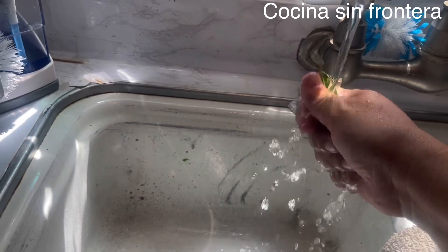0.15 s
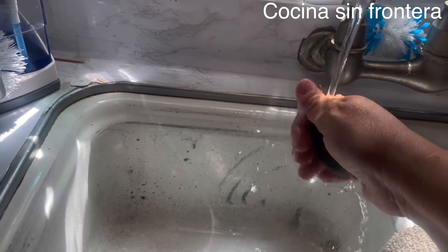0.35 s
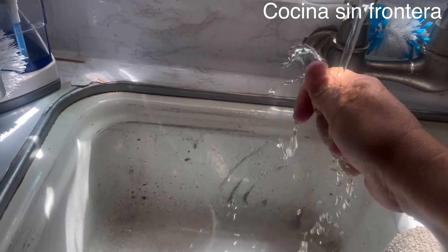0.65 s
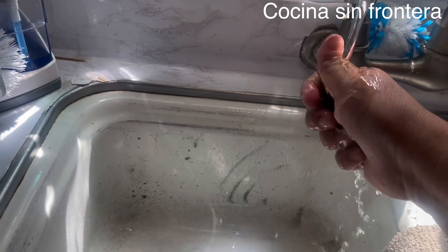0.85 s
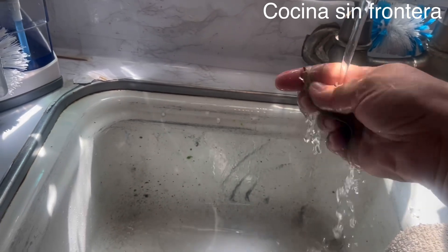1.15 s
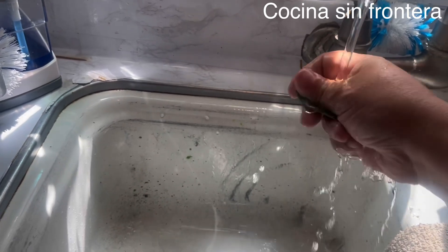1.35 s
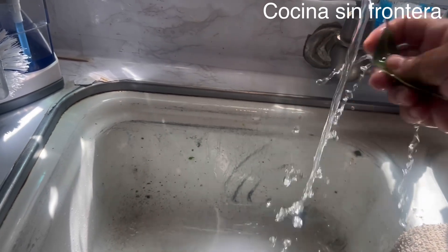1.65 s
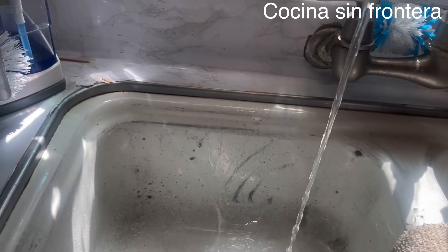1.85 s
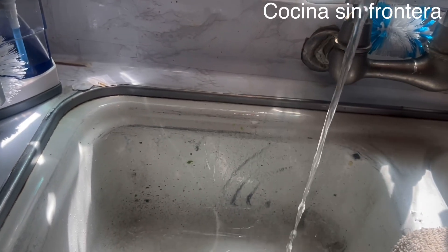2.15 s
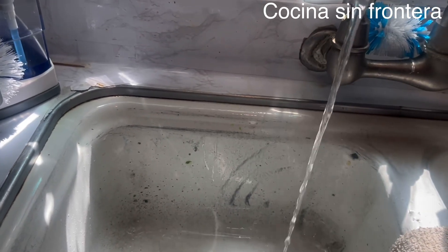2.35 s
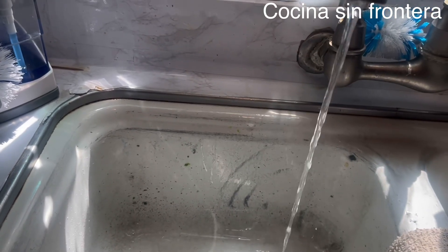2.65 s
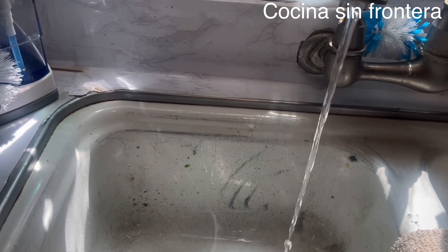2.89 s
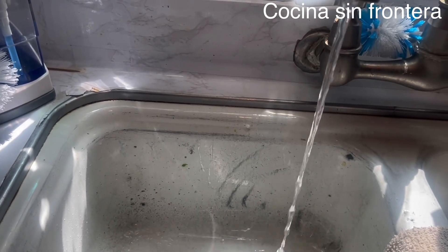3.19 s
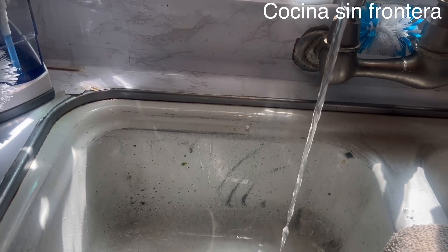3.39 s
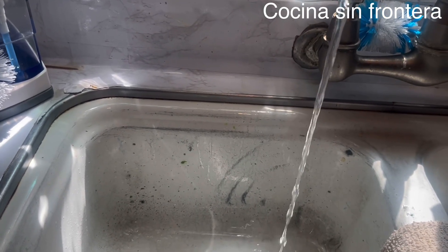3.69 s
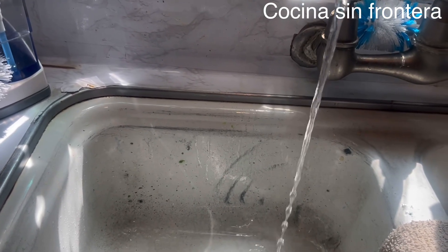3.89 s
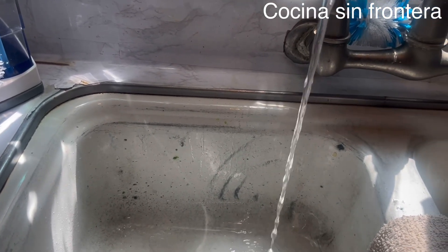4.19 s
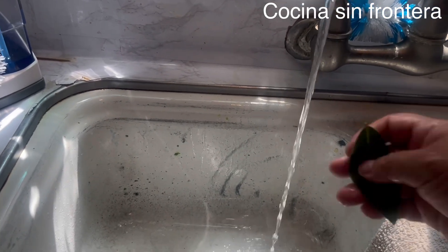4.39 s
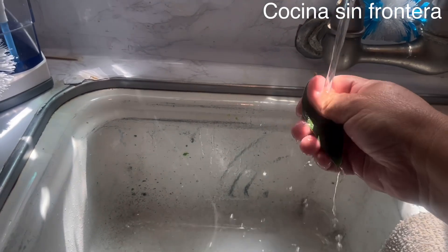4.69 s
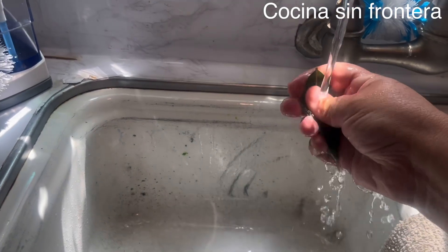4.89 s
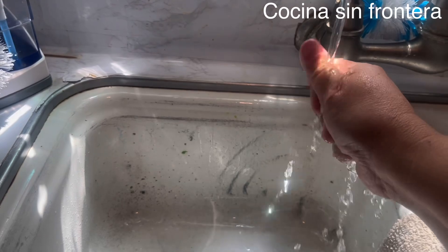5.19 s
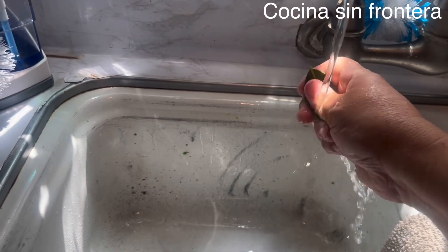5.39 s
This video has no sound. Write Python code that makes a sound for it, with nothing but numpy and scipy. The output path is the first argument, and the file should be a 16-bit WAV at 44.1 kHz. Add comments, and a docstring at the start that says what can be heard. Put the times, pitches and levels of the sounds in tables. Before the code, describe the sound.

Thin tap water splashes unevenly off a moving hand into a metal sink, then falls freely with hollow patter before being broken up again.

```python
"""A thin tap stream falls into a steel kitchen sink; a hand rinsing leaves breaks it up, leaves it and returns.
Drops burst in the shallow water: each is a crack of noise, gliding bubble tones, a low plop and splatter.
From about 1.8 to 4.6 s the stream falls freely and its patter and lumps ring the modes of the basin.
Fine spray hisses as flickering filtered noise; low rumble and an appliance's wavering hum lie behind.
Two microphone ports a few centimetres apart hear it from the side."""
import sys
import numpy as np
from scipy import signal
from scipy.fft import rfft, irfft
from scipy.io import wavfile

SR = 44100
rng = np.random.default_rng(int(sys.argv[2]) if len(sys.argv) > 2 else 0)


def store_wav(level_fs):
    """Save 16-bit WAV to argv[1]."""
    pcm = np.round(np.clip(np.atleast_2d(level_fs), -1, 1) * 32767)
    wavfile.write(sys.argv[1], SR, pcm.T.astype(np.int16))


N = 244314
HZ = np.arange(N // 2 + 1) * SR / N   # frequencies of the spectrum bins

# the hand leaves the stream and comes back; each change takes CHANGE_S and is complete at these times
STREAM_LANDS_S, STREAM_BROKEN_S, CHANGE_S = 1.82, 4.65, 0.072
SPRAY_DB, SPRAY_FADE_DB_PER_S = -44.5, 0.36   # rms at the start without gushes, then a slow fade
GUSH_RISE_S, GUSH_FALL_S = 0.043, 0.057
RUMBLE_DB = -43   # rms
MOTOR_HZ, MOTOR_DB = 57.7, -42.5   # mean pitch, rms

DRUM_BROKEN_DB, DRUM_FREE_DB = -60.5, -51   # middle level of the patter that drives the basin modes
RANDOM_LUMPS_PER_S, RANDOM_LUMP_DB, LUMP_SPREAD_DB = 90, -35, 2.5   # free stream only
LUMP_KNOCK, LUMP_WASH = 1.9, 0.36   # gains of the sharp first contact and of the wash that follows

FAINT_PLINKS_PER_S, FAINT_PLINK_DB, FAINT_PLINK_CYCLES = 35, -54, 90   # lowest level; cycles in one t60
SWEEP_ROUGH_DB = 4   # spread of the level flutter
TICKS_PER_S, FREE_TICKS_PER_S = 70, 12   # faint drops; those added under the free stream
FREE_CRACK_DB = 10.5   # the free stream brightens the faint drops
TICK_MS = 0.26   # swell time of a lone tick
BUBBLE_RISE = .03   # relative pitch rise in one swell time
PLOP_HZ, PLOP_SPREAD_HZ = 2607, 180   # lowest plop pitch and random range, at the top of the plop's own swell
FREE_PLOP_RISE, FREE_PLOP_LONGER = 0.13, 0.657   # plops glide less and are shorter under the free stream
TWIN_DB, CRACK_OWN = -7.5, 0.13   # a second, smaller bubble; independent crack noise at each port
SPLATTER_PER_S, SPLATTER_DB, SPLATTER_T60_S = 2500, -24.5, 0.026   # level relative to bubble plus plop
SPLATTER_OWN = 1   # independent part at each port

SINK_T60_S, SINK_DB = 0.11, -9.5   # dense tail: decay of its noise, energy at the left port
ECHO_S, ECHO_DB, ECHO_CUT_HZ = .0035, -12.5, 42000
RING_DB = -43   # offset of all ringing high modes
RIPPLE_PER_S = 1100   # the moving water film keeps changing the tail
CUTOFF_HZ = 16500


def from_db(db):
    """The logarithmic level law: a level in dB becomes an amplitude gain."""
    return 10 ** (np.asarray(db) / 20)


def rms_one(x):
    """Normalisation by mean power: x scaled to rms 1."""
    return x / np.sqrt(np.mean(x ** 2) + 1e-20)


def at_hz(points, hz):
    """Logarithmic pitch scale: a table is interpolated evenly over log frequency."""
    table = np.array(points)
    return np.interp(np.log(hz + 1), np.log(table[:, 0]), table[:, 1])


def coloured(x, spectrum):
    """Linear filtering: each frequency of x is weighted by a gain in dB."""
    return irfft(rfft(x) * from_db(at_hz(spectrum, HZ)), N)


def drift(rate):
    """Low-pass random process: white noise through two equal poles at rate Hz wanders with spread 1."""
    r = np.exp(-2 * np.pi * rate / SR)
    wander = signal.lfilter([1], [1, -2 * r, r * r], rng.standard_normal(N + SR))
    return rms_one(wander[SR:])   # the first second settles the filter


def resonance(x, hz, width):
    """Damped oscillator: a two-pole band-pass with gain near 1 on top, whose width sets its decay."""
    r = np.exp(-np.pi * width / SR)
    poles = [1, -2 * r * np.cos(2 * np.pi * hz / SR), r * r]
    return signal.lfilter([(1 - r * r) / 2, 0, (r * r - 1) / 2], poles, x)


def partly_alike(mid, side):
    """Partial coherence: mid and side noise are weighted so that the ports correlate band by band."""
    # Correlation of steady noise at the two ports: frequency_hz, correlation
    likeness = [(60, 0.94), (300, 0.87), (600, 0.88), (900, 0.25), (2000, 0.53), (5000, 0.37), (7500, 1),
                (16000, 1)]
    alike = np.clip(at_hz(likeness, HZ), 0, 1)
    common = np.sqrt(1 + alike) * rfft(mid)
    opposed = np.sqrt(1 - alike) * rfft(side) * [[1], [-1]]
    return irfft(common + opposed, N) / np.sqrt(2)


def two_draws(make):
    """Independent sources add in power: two runs of a noise maker give stereo noise of rms 1."""
    return rms_one(partly_alike(make(), make()))


def ports(x):
    """Diffraction and path difference: the housing and the gap shift level and phase between the ports."""
    # Left level above right: frequency_hz, level_db
    left_louder = [(60, 1.5), (300, 3), (1500, 0.8), (3000, 4.5), (4000, 4.5), (4900, 8), (6200, 3),
                   (8000, -0.5), (16000, 0.3)]
    # Left phase ahead of right: frequency_hz, phase_rad
    left_leads = [(60, 0), (300, .1), (780, .9), (1500, -1.5), (1900, .4), (3000, .9), (4600, .4),
                  (5500, -1.3), (6600, -1.5), (8200, -3.1), (10000, -4.8), (12000, -6.3), (15500, -9.4)]
    half = from_db(at_hz(left_louder, HZ) / 2) * np.exp(.5j * at_hz(left_leads, HZ))
    return irfft(rfft(x) * [half, 1 / half], N)


def sink(x):
    """Reflection and reverberation: a near-wall echo, ringing high modes, and a dense tail torn by ripples."""
    # Colour of the tail: frequency_hz, gain_db
    tail_colour = [(1200, 5.5), (2000, 12.5), (3500, 11), (5000, 13), (8000, 4.5), (16000, 3.5)]
    # High modes of the basin: pitch_hz, level_db (before RING_DB), t60_s
    high_modes = [(3030, -27, 0.14), (3150, -2, 0.091)]
    t = np.arange(N) / SR
    shared, own = rng.standard_normal(N), rng.standard_normal((2, N))
    decay = from_db(-60 * t / SINK_T60_S) * (1 - np.exp(-t / 0.00029))
    tail = coloured((shared + 0.75 * own) * decay, tail_colour)
    tail = from_db(SINK_DB) * tail / np.sqrt(np.sum(tail[0] ** 2))
    ring = sum(from_db(RING_DB + db - 60 * t / t60) * np.sin(2 * np.pi * hz * t)
               for hz, db, t60 in high_modes)
    delay = np.exp(-2j * np.pi * HZ * ECHO_S)
    echo = from_db(ECHO_DB) * delay / (1 + 1j * HZ / ECHO_CUT_HZ) ** 2
    ripples = np.cos(1.3 * drift(RIPPLE_PER_S)) + np.sin(1.3 * drift(RIPPLE_PER_S))
    return irfft(rfft(x * ripples) * rfft(tail) + rfft(x) * (rfft(ring) + echo), N)


def hum():
    """Narrow-band noise: a motor tone of unsteady speed, and noise twice through resonances that wavers."""
    # Wavering tones: pitch_hz, width_hz (of each of two passes), level_db (rms)
    hum_tones = [(37, 10, -57), (86.14, 3.5, -50), (122.6, 24, -48), (223.6, 25, -57.5), (342.8, 28, -60.5),
                 (474, 7.4, -78)]
    white = rng.standard_normal(N + SR)
    turns = np.cumsum(MOTOR_HZ + 0.58 * drift(3.3)) / SR
    motor = from_db(MOTOR_DB + 0.38 * drift(22)) * np.sqrt(2) * np.sin(2 * np.pi * turns)
    tones = sum(from_db(db) * rms_one(resonance(resonance(white, hz, width), hz, width)[SR:])
                for hz, width, db in hum_tones)
    return motor + tones


def rumble():
    """Spectral shaping: steady noise is weighted towards the bass."""
    # Shape of the rumble before scaling to rms 1: frequency_hz, density_db
    rumble_colour = [(15, -62), (25, -29), (41, -18.5), (64, 1), (87, -8.5), (124, -5.5), (244, -18.5),
                     (458, -11), (541, -22.5), (900, -64), (1170, -77), (1980, -120)]
    return from_db(RUMBLE_DB) * two_draws(lambda: coloured(rng.standard_normal(N), rumble_colour))


def free_stream():
    """Crossfade between flow states: 0 while the hand breaks the stream up, 1 while it falls freely."""
    t = np.arange(N) / SR
    landing = (t - STREAM_LANDS_S) / CHANGE_S + 1
    breaking = (STREAM_BROKEN_S - t) / CHANGE_S
    return np.clip(np.minimum(landing, breaking), 0, 1)


def spray_level():
    """Level envelope in dB: a slow linear fade, with a quick rise and fall at each gush."""
    # Gushes off the hand that raise the spray: peak_s, rise_db (above the steady spray)
    gush_peaks = [(0, 10.5), (1.79, 3)]
    t = np.arange(N) / SR
    gush = sum(db * np.clip(np.minimum(1 + (t - s) / GUSH_RISE_S, 1 - (t - s) / GUSH_FALL_S), 0, 1)
               for s, db in gush_peaks)
    return SPRAY_DB - SPRAY_FADE_DB_PER_S * t + gush


def spray(grain_db, gust_db):
    """Modulated noise: many fine droplets make a hiss that flickers fast and swells in short gusts."""
    # Colour of the hiss as the microphone hears it, before scaling to rms 1: frequency_hz, density_db
    hiss_colour = [(400, 1.5), (800, 2), (1700, 2.5), (2700, -6), (3600, -2), (5000, 1), (7000, 5),
                   (8700, -10), (10200, 1), (12500, 6.5), (14200, 5), (15500, -2)]
    grains = rng.standard_normal(N) * from_db(grain_db * drift(220))
    return coloured(grains, hiss_colour) * from_db(gust_db * drift(22.0))


def drumming(free, patter_db, lump_s, slap_hz):
    """Forced modal vibration: patter rings the basin modes; brief, spread-out lumps favour the higher ones."""
    # Modes of the basin: pitch_hz, width_hz, level_db (response to the force)
    basin_modes = [(336.3, 17, -2.5), (415, 20, -16), (474, 35, -10), (546, 39.5, -3.5), (654, 40, -12.5),
                   (769.4, 26, -12.5), (897, 42, -15), (1188, 200, -12.5), (2020, 62, -17.5),
                   (2750, 420, -16.5)]
    # Single lumps of the stream, strong and weak: start_s, level_db (strength of the blow)
    timed_lumps = np.array([(1.827, -17.5), (2.098, -45), (2.134, -24), (2.182, -35), (2.257, -36),
                            (2.524, -21.5), (2.545, -33), (2.577, -42), (2.592, -17.5), (2.625, -23),
                            (2.71, -26), (2.739, -24.5), (2.81, -19.5), (2.858, -20.5), (2.947, -27),
                            (3.065, -18.5), (3.144, -34), (3.158, -22), (3.191, -23), (3.339, -37),
                            (3.438, -26), (3.47, -19.5), (3.596, -16.5), (3.646, -18.5), (3.679, -27),
                            (3.746, -27), (3.797, -23.5), (3.828, -14.5), (3.877, -21), (3.905, -19.5),
                            (4.081, -51), (4.096, -19.5), (4.335, -25), (4.43, -21), (4.455, -26),
                            (4.206, -33), (4.263, -42), (4.285, -17.5), (4.313, -21), (4.395, -19.5),
                            (4.506, -27), (4.54, -16)])
    drum_db = DRUM_BROKEN_DB + (DRUM_FREE_DB - DRUM_BROKEN_DB) * free
    strength = from_db(RANDOM_LUMP_DB + LUMP_SPREAD_DB * rng.standard_normal(N))
    hits = (rng.random(N) < RANDOM_LUMPS_PER_S * free / SR) * strength
    hits[(timed_lumps[:, 0] * SR).astype(int)] = from_db(timed_lumps[:, 1])
    fade = np.exp(-1 / (lump_s * SR))
    slaps = signal.lfilter([1 - fade], [1, -2 * fade, fade ** 2], hits)
    patter = from_db(drum_db + patter_db * drift(37))
    mode_hz = np.array(basin_modes)[:, :1]
    reach = 1 / (1 + (slap_hz / mode_hz) ** 4)   # a short slap misses the low modes
    push = patter + LUMP_WASH * slaps * reach
    knock = LUMP_KNOCK * hits * reach
    force = rng.standard_normal((2, N))
    modes = 0
    for k, (hz, width, db) in enumerate(basin_modes):
        level = from_db(db) * np.sqrt(SR / width / 2)   # equal noise power whatever the width
        modes = modes + (-1) ** k * level * resonance(force * push[k] + knock[k], hz, width)
    mid, side = modes
    return partly_alike(mid, side)


def plinks():
    """Bubble resonance: trapped air rings as decaying, wobbling sines; many faint ones come at random."""
    # Ringing tones of the clearest plinks, some several to a plink:
    # start_s, level_db (before soft start and wobble), pitch_hz, t60_s
    plink_tones = [(.027, -26.5, 2270, 0.045), (0.029, -27, 1580, 0.044), (0.959, -40.5, 2120, 0.056),
                   (0.286, -39, 2120, 0.056), (0.62, -41, 1400, 0.051), (0.63, -34, 2550, 0.025),
                   (1.06, -41.5, 1630, 0.038), (1.539, -43, 1610, .04), (0.026, -27, 3200, 0.014),
                   (0.201, -42, 1300, 0.022), (0.21, -42, 2400, .02), (0.286, -34, 3030, 0.015),
                   (.614, -35, 3300, 0.018), (1.34, -37, 1270, .02), (2.913, -27, 1175, 0.05),
                   (2.914, -33, 1070, 0.046), (4.868, -41, 1580, 0.12), (1.3, -45, 1600, 0.061),
                   (5.097, -30, 7100, 0.026)]
    born = np.flatnonzero(rng.random(N) < FAINT_PLINKS_PER_S / SR)
    u = rng.random((N, 2))[born]
    faint_hz = 2600 * 2.8 ** u[:, 0]
    faint = np.c_[born / SR, FAINT_PLINK_DB + 9 * u[:, 1], faint_hz, FAINT_PLINK_CYCLES / faint_hz]
    s, peak_db, hz, t60 = np.r_[plink_tones, faint].T[:, :, None]
    steps = np.arange(SR // 6)
    age = steps / SR
    soft_start = 1 - np.exp(-age / 0.00029)
    rings = from_db(peak_db - 60 * age / t60) * np.sin(2 * np.pi * hz * age) * soft_start
    out = np.bincount(((s * SR).astype(int) + steps).ravel(), rings.ravel(), N)[:N]
    return out * from_db(2.0 * drift(150))


def sweeps():
    """Shrinking cavity: as a drip's cavity closes slowly, a rough sine whistles upward under a smooth swell."""
    # Slowly closing cavities: start_s, level_db (before roughness), from_hz, to_hz, length_ms
    closing_cavities = [(0.324, -25.5, 1445, 4040, 13.8), (1.156, -24, 1900, 4230, 7.2),
                        (1.177, -40, 2420, 4200, 6), (1.292, -32.5, 1875, 4430, 9.3),
                        (1.751, -30, 1890, 5030, 7.2), (5.334, -27, 1900, 5500, 8.1)]
    out, t = np.zeros(N), np.arange(N) / SR
    for s, peak_db, from_hz, to_hz, ms in closing_cavities:
        part = np.clip((t - s) * 1000 / ms, 0, 1)
        turns = np.cumsum(from_hz * (to_hz / from_hz) ** part) / SR
        out += from_db(peak_db) * np.sin(np.pi * part ** 0.99) ** 2 * np.sin(2 * np.pi * turns)
    return out * from_db(SWEEP_ROUGH_DB * drift(480))


def small_pops(per_s, level_db, crack_db):
    """Random arrivals: faint drops fall at chance instants, with chance levels, pitches and swell times."""
    at = np.flatnonzero(rng.random(N) < per_s / SR)
    u = rng.random((N, 5))[at]
    db = level_db[at]
    bubble_db, bubble_hz = db + 12 * u[:, 0], 2200 * 3.4 ** u[:, 1]
    plop_db = db - 14 + 14 * u[:, 2]
    bright_db = db + crack_db[at] + 15 * u[:, 3]
    return np.c_[at / SR, bubble_db, bubble_hz, plop_db, bright_db, .25 + .6 * u[:, 4]]


def ticks():
    """Impact without resonance: droplets too small to trap a bubble give bursts that are all crack."""
    # Lone bright ticks: start_s, crack_db (before the trim and colour of the bursts)
    lone_ticks = [(0.6773, -9), (1.8898, -14), (1.905, -16), (2.067, -13), (2.1605, -28), (2.225, -20),
                  (2.2925, -9.5), (2.303, -10.5), (2.3714, -13), (2.4239, -12), (2.4623, -26),
                  (2.5718, -21), (2.8077, -17), (2.828, -20), (2.8743, -20), (2.958, -30), (3.0736, -10),
                  (3.076, -11), (3.1453, -9), (3.207, -13.5), (3.3315, -16), (3.4176, -16), (3.86, -19),
                  (3.8743, -13), (3.9445, -16), (4.2507, -17), (4.3686, -11), (4.456, -12), (4.483, -29),
                  (4.578, -15), (5.268, -21), (5.31, -16)]
    s, db = np.transpose(lone_ticks)
    none = np.full(len(s), -120.)
    return np.c_[s, none, 0 * s, none, db, TICK_MS + 0 * s]


def splatter(strength, t):
    """Secondary impacts: each burst throws a dying scatter of droplets, ringing briefly at a few pitches."""
    shape = (len(strength), len(t))
    falls = (rng.random(shape) < SPLATTER_PER_S / SR) * from_db(6 * rng.standard_normal(shape))
    falls = falls * strength * from_db(SPLATTER_DB - 60 * t / SPLATTER_T60_S)
    signs = rng.choice([-1, 1], shape)
    sides = falls * (signs + SPLATTER_OWN * rng.standard_normal((2,) + shape))
    pitches = np.geomspace(2300, 7000, 9)
    dealt = rng.integers(0, 9, shape[0])[:, None] + rng.choice([0, 2, 5], shape)   # three pitches a burst
    return sum(np.sqrt(SR / hz) * resonance(sides * (dealt % 9 == k), hz, 0.21 * hz)
               for k, hz in enumerate(pitches))


def pops(faint, free, rise, plop_rise, plop_longer, ragged, steep):
    """Drop impact and bubble oscillation: a noise crack, two torn bubbles, a slower rising plop, splatter."""
    # Loudest bursts, levels before trim and colour:
    # start_s, bubble_db, bubble_hz (at the top of the swell), plop_db, crack_db, swell_ms (at least 0.2)
    loud_bursts = [(0.1321, -35, 6000, -50, -25, 1.3), (0.2449, -28.5, 4440, -29, -23.5, 1.3),
                   (0.341, -23.5, 5830, -48, -17, 1.1), (0.359, -25, 6300, -50, -24, 1.2),
                   (0.4085, -22.5, 5480, -29, -34, 1.6), (0.4275, -11, 4550, -23, -40, 1),
                   (0.4285, -17, 6360, -57, -44, 0.77), (0.5189, -18, 6300, -55, -43, 0.74),
                   (0.6389, -28.5, 6600, -50, -23, 1.2), (0.7165, -32, 5970, -43, -40, 1.6),
                   (0.7195, -12.5, 3090, -18.5, -45, 1.45), (0.7218, -15, 6140, -30, -40, 1.65),
                   (0.7455, -20, 5210, -50, -32, 1.1), (0.7529, -20, 7130, -45, -14, 1.6),
                   (0.7535, -15.5, 3420, -45, -40, 0.93), (0.7905, -29, 6896, -50, -9.5, 0.67),
                   (0.7975, -22, 3020, -42, -40, 2.1), (0.8033, -17.5, 4930, -40, -15, 1.56),
                   (0.856, -29, 5360, -50, -37, 0.66), (1.0665, -8, 5850, -48, -5, 0.56),
                   (1.1096, -19, 5770, -20.5, -30, 0.82), (1.1371, -14, 5850, -50, -15, 0.53),
                   (1.1605, -16, 5970, -45, -35, 0.96), (1.1772, -18, 3600, -50, -35, 1.1),
                   (1.2011, -21, 5840, -42, -34, 1.3), (1.2211, -24, 6100, -50, -30, 0.92),
                   (1.2329, -24, 6600, -32, -11.5, 0.5), (1.2499, -23, 4400, -50, -18, 0.96),
                   (1.2689, -10.5, 5470, -13, -35, 0.65), (1.3161, -37, 7200, -25, -3.5, 0.18),
                   (1.358, -36, 4240, -50, -40, 0.95), (1.374, -29, 2670, -40, -40, 0.87),
                   (1.426, -33, 6300, -54, -23, 0.92), (1.452, -24, 2980, -40, -23, 0.98),
                   (1.5571, -22, 6300, -29, -12.5, 1.2), (1.5842, -23.5, 5270, -50, -24, 1.5),
                   (1.64, -31, 5550, -50, -15.5, .8), (1.6582, -17, 4900, -13.5, -39, 0.89),
                   (1.697, -24.5, 5280, -50, -38, 1.6), (1.6965, -29, 4180, -50, -38, 1.1),
                   (1.7501, -12, 4760, -12, -12, 0.89), (1.76, -6.5, 6400, -39, -5, 0.17),
                   (1.7712, -6, 4420, -10.5, -14, 0.48), (1.7867, -16.5, 6000, -40, -23, 1),
                   (1.7957, -6.5, 4740, -30, -28, 0.29), (1.8102, -4.5, 5000, -4, -20, 0.19),
                   (1.8297, -17.5, 6640, -18, -8, 0.65), (1.832, -15.5, 5200, -38, -30, 0.74),
                   (1.9365, -15.5, 5110, -42, -9, 0.65), (1.9599, -11.5, 6100, -14, -13, 0.42),
                   (1.9817, -17, 4950, -44, -12, 0.74), (2.0053, -22, 7080, -48, -14, 2.4),
                   (2.0249, -7.5, 5640, -39, -0.5, 0.17), (2.0977, -26, 5160, -49, -15.5, 0.42),
                   (2.1821, -12.5, 4920, -1.5, -13.5, 1), (2.2541, -7.5, 5040, -49, -14, 0.63),
                   (2.5227, -30, 6560, -25, -8.5, 1.7), (2.5918, -10, 4810, -3.5, -5.5, 1),
                   (2.6226, -5.5, 4490, -8, -1.5, 0.77), (2.6677, -21, 4660, -35, -31, 1),
                   (2.7104, -34, 6540, -28, -22, 2.5), (2.718, -8.5, 4840, -33, -45, 0.89),
                   (2.8472, -14, 5040, -46, -9.5, 0.79), (2.8876, -19, 6100, -47, -9.5, 0.47),
                   (2.946, -14, 4770, -44, -7.5, 1.2), (3.0104, -11, 4680, -5, -13, 0.94),
                   (3.1588, -5.5, 4400, -14, -9.5, 0.44), (3.1728, 3, 7060, -39, -4.5, 0.19),
                   (3.1886, -15.5, 4930, -42, -6, 1), (3.348, -7, 4920, -56, -12, 0.5),
                   (3.3843, -11.5, 4690, -55, -13, 1), (3.4694, -10, 4740, -2, -11.5, 0.75),
                   (3.4967, -21.5, 4420, -32, -23, 1.2), (3.5676, -31, 4900, -20, -34, 0.43),
                   (3.6584, -40, 5840, -24, -21, 0.91), (3.7358, -29, 4800, -53, -20, 0.58),
                   (3.7417, -20, 6900, -49, -10.5, 0.94), (3.7977, -13.5, 4600, -18, -12.5, 0.32),
                   (3.8271, -32, 7960, -25, -7, 0.9), (3.8811, -10.5, 4550, -1, -7.5, 0.88),
                   (4.0399, -26, 6260, -45, -18, 0.85), (4.0954, -13, 4820, -39, -8, 1.1),
                   (4.1085, -21.5, 6100, -46, -16, 1), (4.203, -10, 7540, -45, -4.5, 0.76),
                   (4.2086, -21, 7000, -50, -31, 0.6), (4.2634, -20, 6870, -44, -13.5, 0.91),
                   (4.3132, -31, 5420, -50, -11.5, 0.18), (4.3968, -12.5, 4510, -42, -8, 1),
                   (4.4319, -18, 7300, -23.5, -9, 0.9), (4.5531, -28, 7840, -32, -10, 0.59),
                   (4.589, -9, 4780, -48, -13, 0.47), (4.748, -30, 6330, -40, -16, 0.7),
                   (5.2779, -14, 5260, -50, -26, 0.82), (5.339, -13, 4740, -26, -43, 0.59)]
    # Colour of all bursts: frequency_hz, gain_db
    burst_colour = [(1200, -33), (2000, -13), (3000, -15), (4000, -6.5), (5000, -6.5), (6000, -7),
                    (7500, 0), (9000, -8), (13000, 0), (16000, -10.5)]
    rows = np.r_[loud_bursts, ticks(), faint]
    s, bubble_db, bubble_hz, plop_db, crack_db, ms = np.transpose(rows)[:, :, None]
    start = (s * SR).astype(int)
    steps = np.arange(800)
    t = steps / SR
    noise, chance = rng.standard_normal((len(rows), 800)), rng.random((len(rows), 4))

    def swell(ms):
        """Critically damped envelope: rises to 1 at ms, then dies away."""
        return (t * 1000 / ms * np.exp(1 - t * 1000 / ms)) ** steep

    def chirp(hz, ms, rise, turn):
        """Linear frequency glide: a swelling sine that passes hz at time ms."""
        turns = hz * t * (1 + rise * (t * 1000 / ms / 2 - 1)) + turn
        return swell(ms) * np.sin(2 * np.pi * turns)

    ms = np.maximum(ms, .2)
    freely = free[start]
    plop_rise = plop_rise + (FREE_PLOP_RISE - plop_rise) * freely
    plop_longer = plop_longer + (FREE_PLOP_LONGER - plop_longer) * freely
    sides = noise + CRACK_OWN * rng.standard_normal((2,) + noise.shape)
    bright = signal.sosfilt(signal.butter(3, 6000, "high", fs=SR, output="sos"), sides)
    crack = from_db(crack_db - 3.5) * bright * swell(0.53 + 0.11 * ms)
    dull = signal.lfilter([.4], [1, -.75], noise[:, ::-1])   # the bubble wall tears unevenly
    twin_hz = 1.1 * bubble_hz * 1.312 ** chance[:, 3:]
    twin = from_db(TWIN_DB) * chirp(twin_hz, 0.78 * ms, rise, chance[:, 2:3])
    pair = chirp(bubble_hz, ms, rise, chance[:, :1]) + twin
    bubble = from_db(bubble_db) * pair * (1 + ragged * dull)
    plop_hz = PLOP_HZ + PLOP_SPREAD_HZ * chance[:, 1:2]
    low = chirp(plop_hz, plop_longer * ms, plop_rise, chance[:, 2:3])
    plop = from_db(plop_db) * low * (1 + 0.14 * dull)
    bursts = crack + bubble + plop + splatter(from_db(bubble_db) + from_db(plop_db), t)
    at = (start + steps).ravel()
    placed = np.array([np.bincount(at, b.ravel(), N + 800)[:N] for b in bursts])
    return coloured(placed, burst_colour)


def scene():
    """Superposition: water and its reflections in the sink add to the drumming basin, rumble and hum."""
    free, spray_db = free_stream(), spray_level()
    steady = rumble() + hum()
    water = from_db(spray_db) * two_draws(lambda: spray(grain_db=-2.0, gust_db=1.3))
    basin = drumming(free, patter_db=2.0, lump_s=0.003, slap_hz=432)
    faint = small_pops(TICKS_PER_S + FREE_TICKS_PER_S * free, spray_db, FREE_CRACK_DB * free)
    bursts = pops(faint, free, rise=BUBBLE_RISE, plop_rise=0.287, plop_longer=1.72, ragged=0.72, steep=1.2)
    drops = plinks() + sweeps() + bursts
    return ports(drops + water + sink(drops + water) + basin + steady)


def record(dry):
    """Saturation and band limiting: the highest peaks are rounded, the top is cut."""
    low_pass = signal.cheby2(12, 70, CUTOFF_HZ, fs=SR, output="sos")
    return signal.sosfilt(low_pass, np.tanh(dry))


dry = scene()
out = record(dry)
store_wav(out)
```